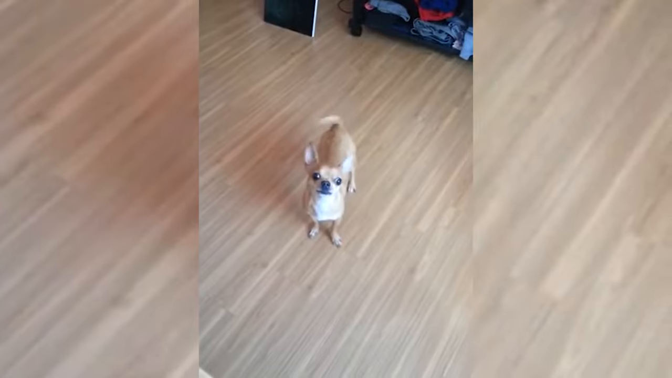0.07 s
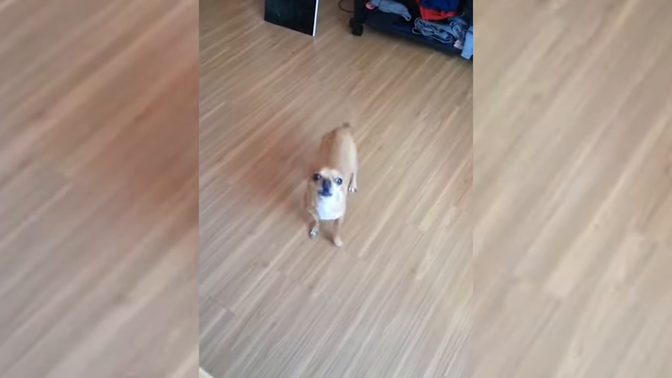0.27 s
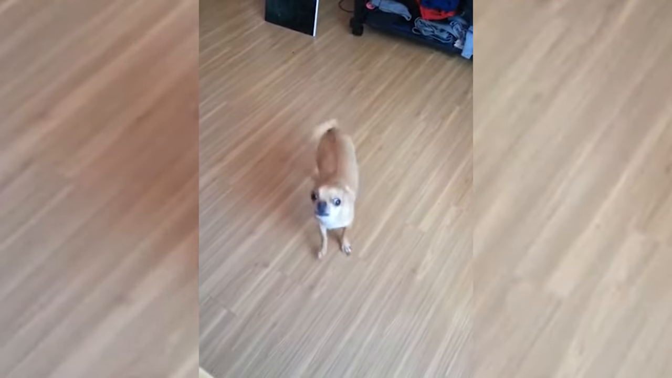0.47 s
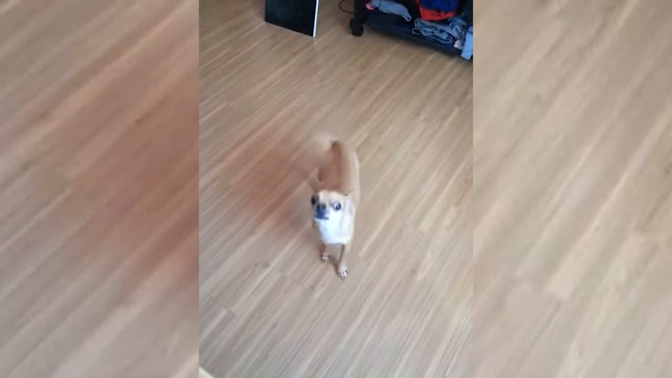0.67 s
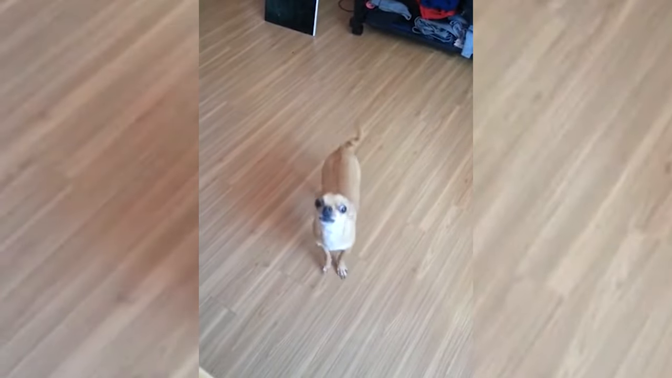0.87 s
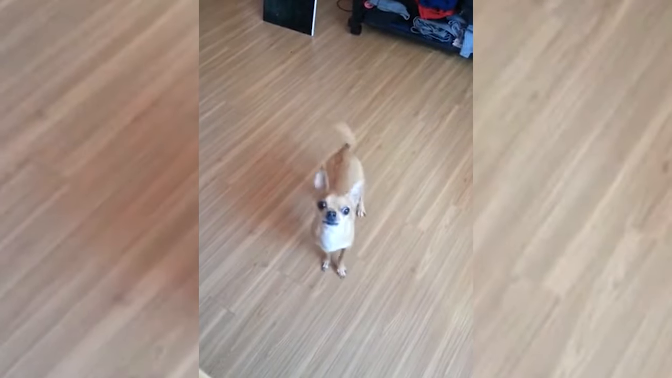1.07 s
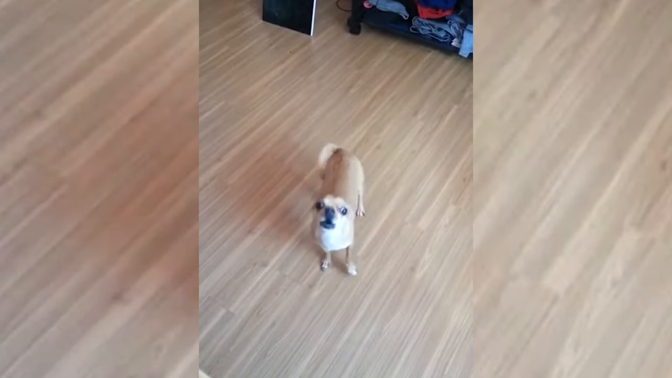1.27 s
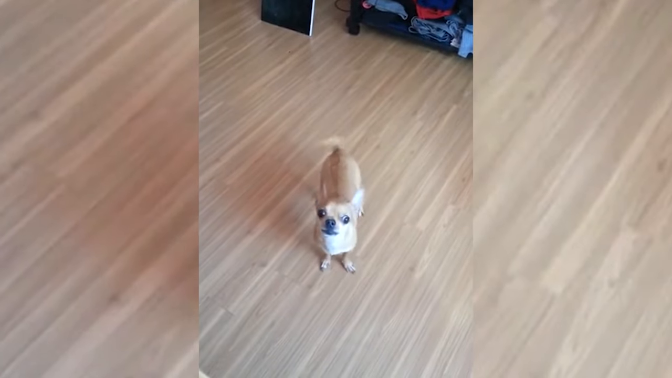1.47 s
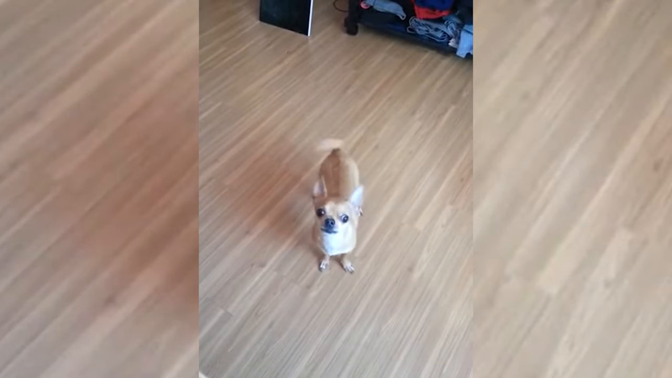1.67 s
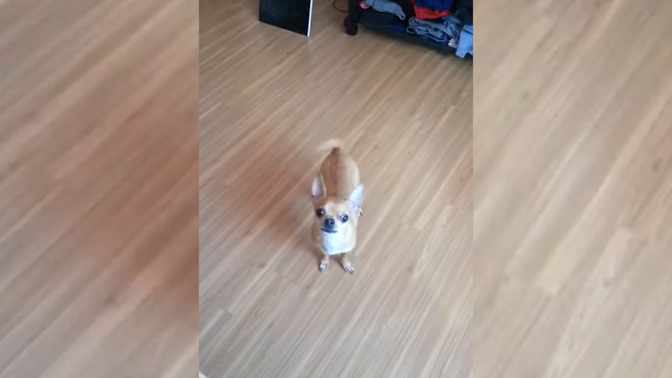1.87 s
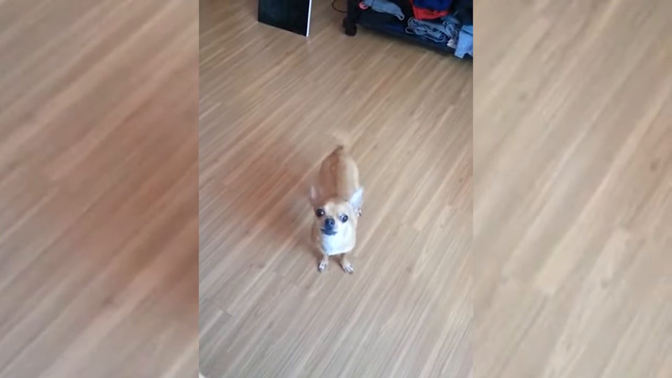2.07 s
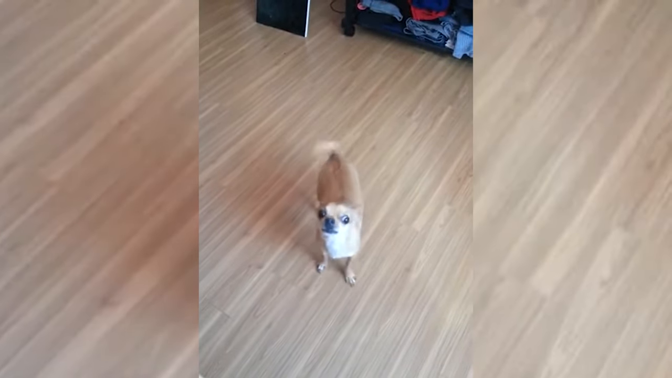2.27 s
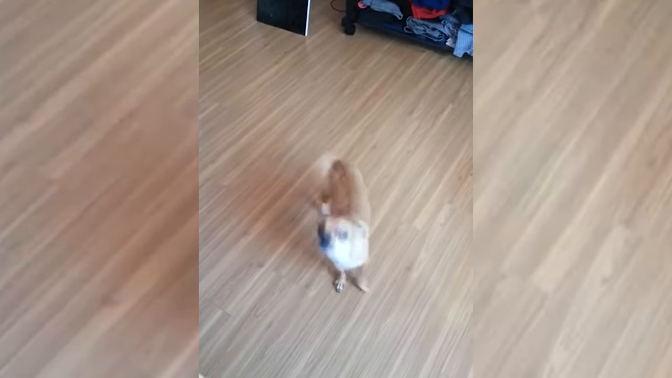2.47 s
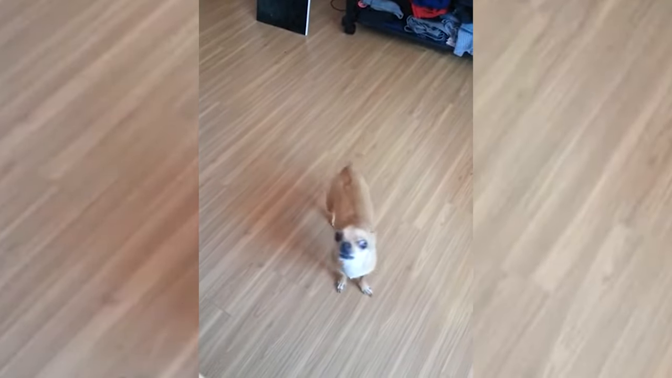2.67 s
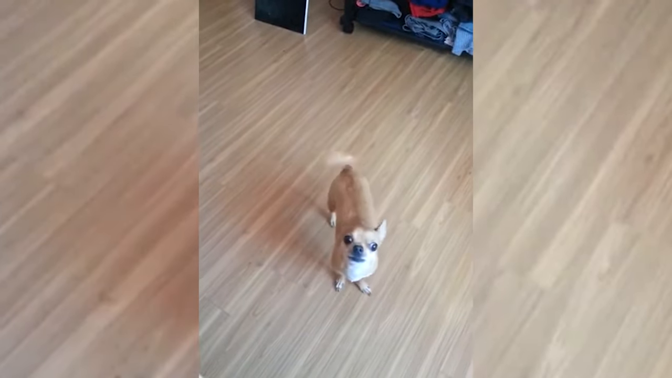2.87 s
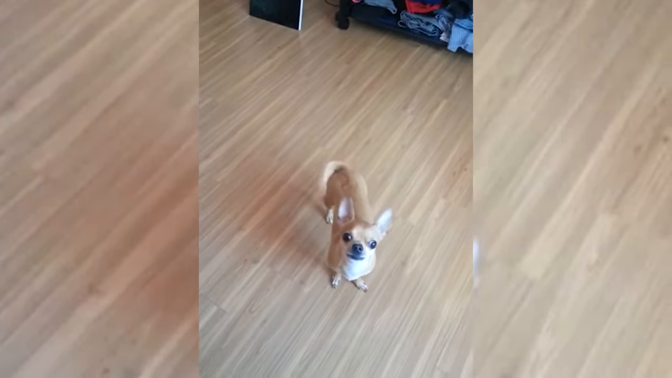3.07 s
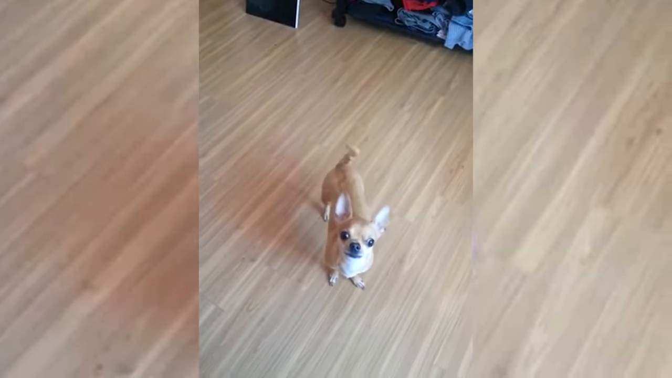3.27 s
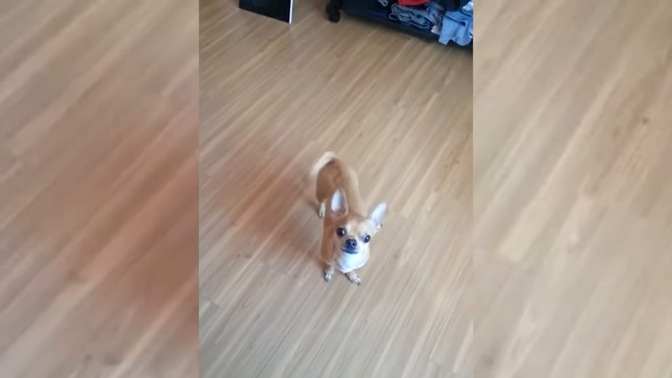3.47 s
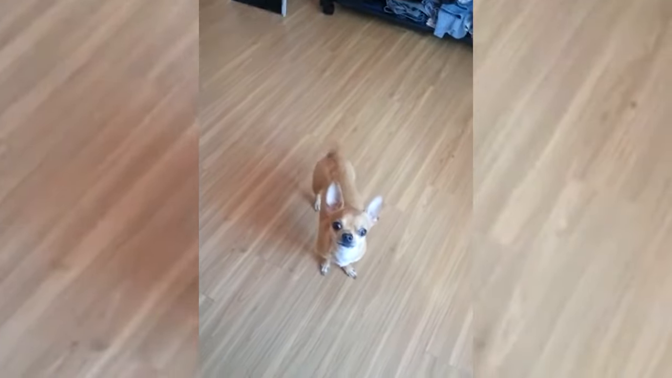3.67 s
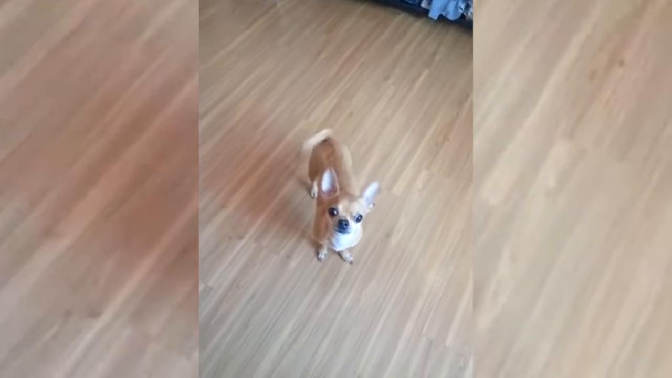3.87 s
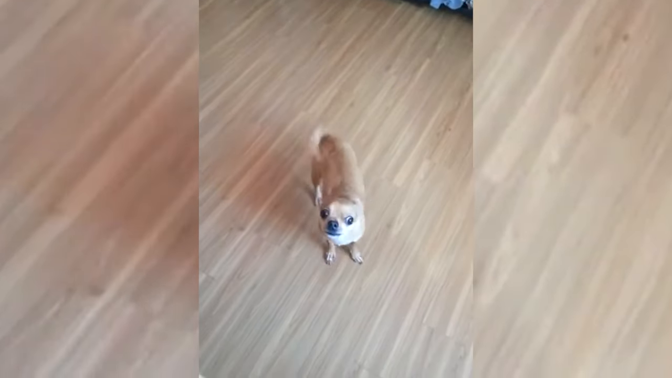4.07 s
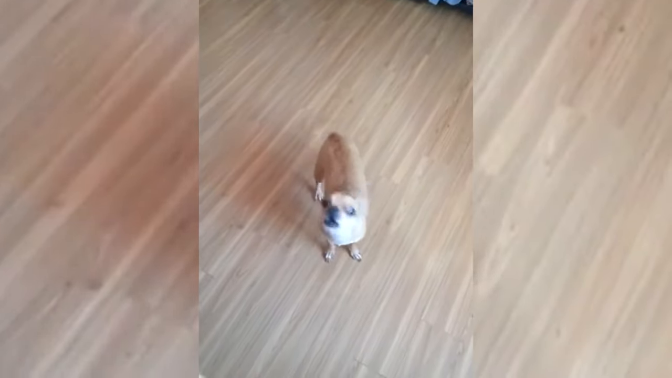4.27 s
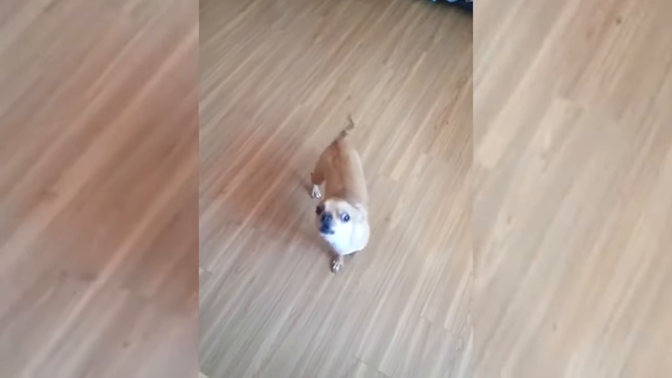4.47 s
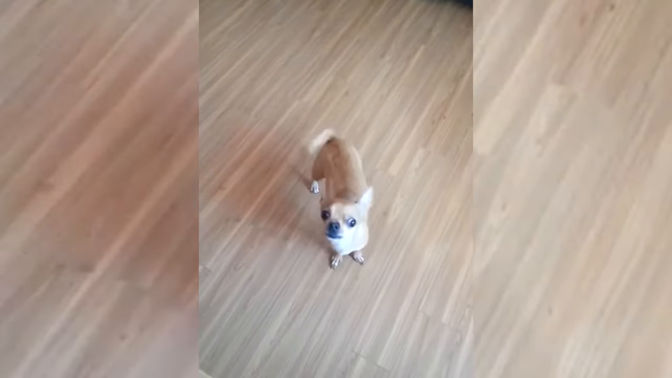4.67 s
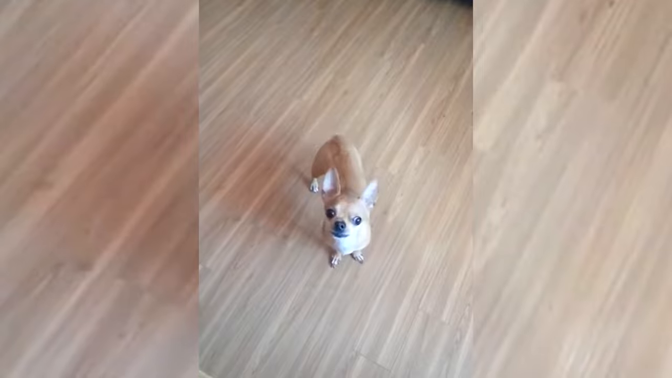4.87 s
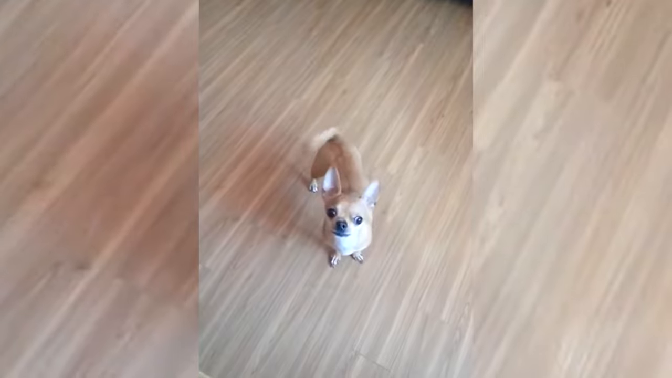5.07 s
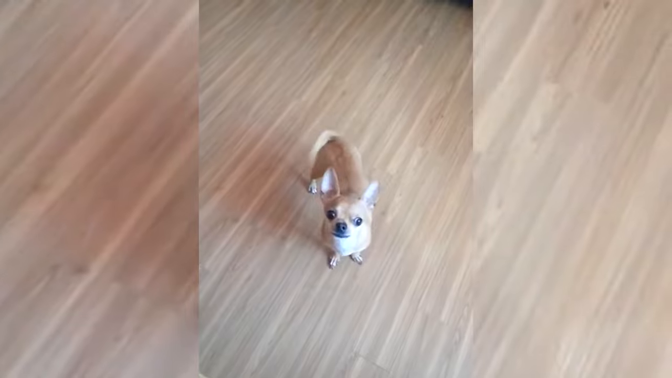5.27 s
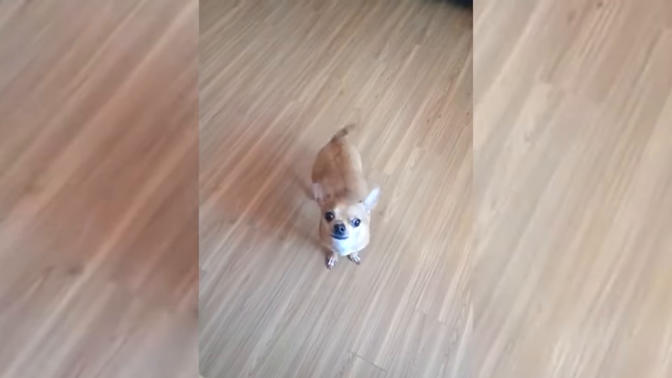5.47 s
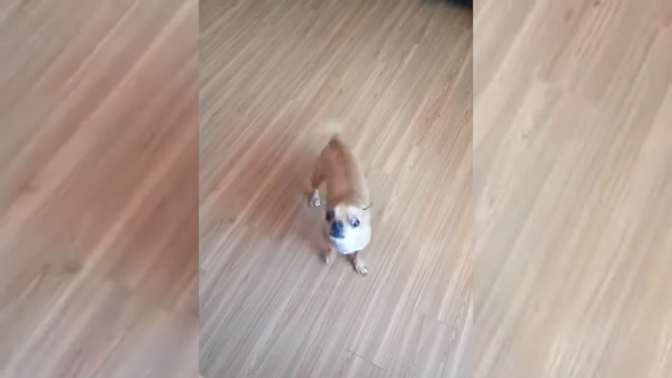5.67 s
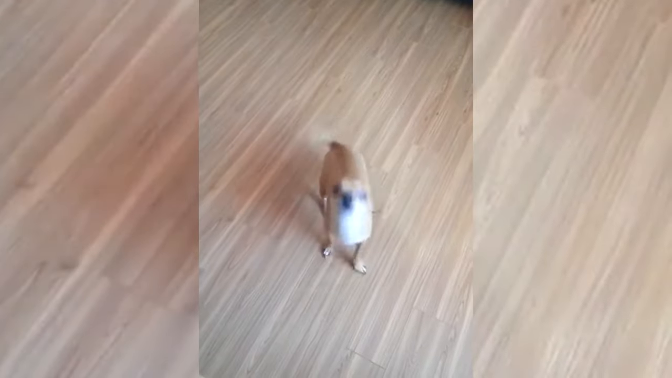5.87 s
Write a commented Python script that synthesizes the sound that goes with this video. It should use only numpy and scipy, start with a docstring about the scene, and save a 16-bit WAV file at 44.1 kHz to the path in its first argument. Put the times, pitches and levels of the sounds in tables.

```python
"""Small dog barking in a bare room

A chihuahua barks twelve times, in bunches, in a bare room with a wooden floor, over quiet air and hiss.
Each bark is a source-filter voice: harsh folds climb to a crest of pitch, then break into a clearer yelp.
Sniffs and shuffles are swells of coloured noise; grunts are single decaying noise flaps of the folds.
Echoes and a diffuse tail follow every bark, and loud peaks overload both microphones."""
import sys
import numpy as np
from scipy import signal
from scipy.fft import rfft, irfft
from scipy.io import wavfile
from scipy.ndimage import uniform_filter1d

SR = 44100
rng = np.random.default_rng(int(sys.argv[2]) if len(sys.argv) > 2 else 0)


def store_pcm(level_fs):
    """Save levels as 16-bit WAV."""
    pcm = np.round(np.clip(level_fs, -1, 1) * 32767).astype(np.int16)
    wavfile.write(sys.argv[1], SR, np.atleast_2d(pcm).T)


N = 260627
TIME = np.arange(N) / SR

# barks, a bite that breaks into a yelp; levels are relative, before the room:
# start_s, attack_s, climb_s, break_s, yelp_s, crest_hz, yelp_hz, arch_share, sag_share, bite_db, yelp_db,
# yelp_rough_0_to_1, yelp_mouth_hz (lower resonance), bite_upper_hz, yelp_upper_hz (upper resonance)
BARK_GESTURES = [ (0.237, 0.024, 0.019, 0.056, 0.062, 664.7, 515.2, -0.00098, 0.34, -1, -4.5, 0.36, 1300, 2700, 2130),
                 (.458, .034, 0.027, 0.026, .1, 692.3, 420.3, 0.071, 0.25, 0.5, -6.5, 0.069, 913, 1450, 1890),
                 (.676, 0.038, 0.042, .02, 0.065, 590.7, 361.7, .06, .14, -6, -12, 0.21, 800, 1500, 1900),
                 (1.172, 0.039, 0.049, 0.025, 0.061, 544.9, 472.2, -0.024, 0.36, -3.5, -4, 0.083, 1270, 2820, 2250),
                 (2.04, .032, .064, .022, 0.046, 610, 628.5, .05, 0.28, -0.5, -4.5, 0.39, 1330, 2810, 2230),
                 (2.277, 0.031, .072, .022, 0.074, 642, 413, 0.0085, .26, -6, -11.5, .15, 880, 2450, 1700),
                 (2.492, 0.033, 0.038, 0.015, 0.1, 624.3, 386.5, 0.042, 0.24, -5.5, -10.5, .1, 798, 1764, 2283),
                 (3.891, .036, .066, .034, .05, 598, 534.6, 0.038, 0.22, 0, -9, .32, 1190, 2840, 2400),
                 (4.188, .044, .044, .034, 0.068, 571.1, 440.2, -0.012, .23, 0, -6.5, 0.22, 1020, 2480, 1960),
                 (4.402, 0.04, 0.04, .038, 0.055, 533.5, 414, -.07, 0.46, -8.5, -8, 0.24, 1130, 1400, 1610),
                 (5.497, 0.018, 0.029, 0.029, 0.076, 559.9, 491, 0.084, -.03, -2, -3.5, 0.34, 1098, 2450, 2110),
                 (5.729, 0.03, 0.046, .026, 0.079, 641.2, 462.4, -0.055, 0.21, -0.5, -8, 0.14, 1070, 2500, 2120),
                 ]
# short throaty grunts: start_s, level_db, fade_s, mouth_hz
GRUNT_FLAPS = [(.81, -16, 0.023, 700), (.866, -26, 0.013, 675), (.893, -29, 0.021, 656),
               (.94, -25, 0.0086, 736), (.978, -20, 0.005, 760), (1, -33, 0.0085, 716),
               (1.028, -27.5, 0.0066, 668), (1.155, -18.5, 0.0041, 656), (1.166, -25, 0.015, 667),
               (2.8, -30, 0.012, 461), (2.841, -42, 0.032, 450), (4.589, -21.5, 0.013, 505)]
# quick sniffs and gasps: middle_s, length_s, level_db
SNIFF_SWELLS = [(.41, 0.082, -33.5), (.64, 0.1, -43.5), (.86, 0.051, -39), (.93, 0.044, -34),
                (2.22, 0.12, -46.5), (2.43, 0.16, -41), (4.12, .12, -51.5), (4.38, 0.056, -32.5),
                (4.6, 0.083, -39), (5.462, 0.055, -40), (5.72, 0.083, -33.5)]
# soft shuffles on the boards: middle_s, length_s, level_db
SHUFFLE_SWELLS = [(1.7, 0.11, -57.5), (3.25, 0.048, -59), (3.36, 0.27, -53), (3.62, 0.089, -62.5),
                  (5.19, 0.043, -52.5), (5.32, 0.28, -58.5)]
# spectral colour of the throat: frequency_hz, gain_db
THROAT_COLOUR = [(40, -55), (120, -49), (300, -24), (430, -13.5), (580, -8.5), (780, -0.5), (1350, -3),
                 (1620, -7), (2200, -14), (2950, -24.5), (3450, -29.5), (8000, -34), (14000, -47.5)]
# spectral colour of breath in the sniffs: frequency_hz, gain_db
BREATH_COLOUR = [(60, -42.5), (300, 3), (1500, -18), (2800, -2), (4500, 3), (8000, -3), (14000, -14.5)]
# spectral colour of the shuffles: frequency_hz, gain_db
BOARD_COLOUR = [(60, -24), (180, -6.5), (450, 2), (1300, 4.5), (3000, -5), (10000, -26)]
# reverberation time, for a decay of 60 dB: frequency_hz, t60_s
REVERB_TIME = [(150, 0.79), (500, 0.51), (1000, 0.45), (2200, 0.38), (3500, 0.11), (6000, 0.26),
               (12000, 0.24)]
# left-right correlation of the diffuse tail: frequency_hz, correlation (-1 to 1)
TAIL_CORRELATION = [(100, 1), (500, 0.99), (1000, 0.27), (1800, -.15), (4000, -0.055)]
# first reflections from floor and walls: delay_s, left_gain, right_gain
FIRST_REFLECTIONS = [(.0013, 0.05, .2), (.0052, 0.2, .08), (.0094, .08, .22), (0.0148, .18, .1)]
# spectral colour of room air and hiss: frequency_hz, gain_db
HUSH_COLOUR = [(20, -27), (60, -19.5), (110, -6.5), (170, 5), (400, 0), (900, 1), (1700, 0), (3000, -2.5),
               (4500, -4), (6300, -10), (8500, -5), (14000, -8)]
# response of the left microphone, turned away, against the right one: frequency_hz, gain_db
LEFT_RESPONSE = [(250, 3), (550, -3), (800, -1), (1100, -3), (1500, -7.5), (2000, 3), (4000, -5.5),
                 (10000, -7)]

# band limits of the whole sound and of the hush (Hz); level of the hush averaged over both channels (dB)
EDGE_HZ, HUSH_EDGE_HZ, HUSH_DB = 15000, 14400, -55.5
# pitch scatter and strength scatter at full roughness; gain of the air, times roughness squared
JITTER, SHIMMER, AIR = .075, .75, 2.7
# pitch starts at this share of the crest; exponents bend the climb and the final sag
START_SHARE, CLIMB_BEND, SAG_BEND = .56, .85, 2.1
# effort below the bite at the first instant and below the yelp at the last (dB); exponent of the fade
ONSET_DB, FADE_DB, FADE_BEND = -31, -10, 1.15
# roughness (0-1) at the first instant, in the bite, and as the folds run out of air
ROUGH_START, ROUGH_BITE, ROUGH_END = 0.36, 0.41, 0.39
# lower mouth resonance in the bite, jaw nearly shut and wide open (Hz)
JAW_SHUT_HZ, JAW_OPEN_HZ = 845, 1238
# exponent by which the upper resonance follows the yelp's glide
UPPER_FOLLOW = 0.96


def amp(db):
    """Level law: decibels to amplitude gain."""
    return 10 ** (np.asarray(db) / 20)


def unit(x):
    """Normalisation: scales a signal to rms 1."""
    return x / np.sqrt(np.mean(x ** 2) + 1e-20)


def read(points, hz):
    """Interpolation: reads a spectral table along a log-frequency axis."""
    f, value = np.transpose(points)
    return np.interp(np.log(hz + 1), np.log(f + 1), value)


def add(mix, s, sound):
    """Superposition: adds a sound into the mix from time s."""
    part = mix[..., round(s * SR):][..., :sound.shape[-1]]
    part += sound[..., :part.shape[-1]]


def colour(x, points, size=4096):
    """Minimum-phase filtering: the log gain alone fixes a causal response."""
    log_gain = np.log(amp(read(points, abs(np.fft.fftfreq(size, 1 / SR)))))
    spectrum = np.exp(np.conj(signal.hilbert(log_gain)))
    taps = np.fft.ifft(spectrum).real[:size // 2]
    return signal.fftconvolve(x, taps)[:len(x)]


def lowpass(x, hz):
    """Band limitation: a steep symmetric low-pass on both channels."""
    return signal.oaconvolve(x, signal.firwin(255, hz, fs=SR)[None], "same")


def wobble(count, hz):
    """Random modulation: smooth noise of rms 1, reaching up to about hz."""
    f = np.fft.rfftfreq(count, 1 / SR)
    spectrum = rfft(rng.standard_normal(count))
    return unit(irfft(spectrum * np.exp(-(f / hz) ** 2) * (f > 0), count))


def resonate(x, hz, width):
    """Resonance: shifts the curve hz to zero frequency, smooths with a one-pole filter, shifts back."""
    turn = np.exp(2j * np.pi * np.cumsum(hz) / SR)
    r = np.exp(-np.pi * width / SR)
    return 2 * (turn * signal.lfilter([1 - r], [1, -r], x / turn)).real


def gesture(attack_s, climb_s, break_s, yelp_s, crest_hz, yelp_hz, arch, sag, bite_db, yelp_db,
            yelp_rough, yelp_mouth_hz, bite_upper_hz, yelp_upper_hz):
    """Vocal gesture: pitch, effort, roughness and mouth resonances cross from bite to yelp."""
    t = np.arange(0, climb_s + break_s + yelp_s, 1 / SR)
    push = 1 - np.clip(1 - t / attack_s, 0, 1) ** 2
    climb = np.clip(t / climb_s, 0, 1) ** CLIMB_BEND
    broken = np.sin(np.pi / 2 * np.clip((t - climb_s) / break_s, 0, 1))
    spent = np.clip((t - climb_s - break_s) / yelp_s, 0, 1)
    # pitch and mouth glide together through the yelp
    glide = (1 + arch * np.sin(np.pi * spent)) * (1 - sag * spent ** SAG_BEND)
    # each list holds pitch, effort, roughness and lower resonance
    bite = [
        crest_hz * (START_SHARE + (1 - START_SHARE) * climb),
        bite_db + ONSET_DB * (1 - push),
        ROUGH_START + (ROUGH_BITE - ROUGH_START) * push,
        JAW_SHUT_HZ + (JAW_OPEN_HZ - JAW_SHUT_HZ) * np.sqrt(push * climb),
    ]
    yelp = [
        yelp_hz * glide,
        yelp_db + FADE_DB * spent ** FADE_BEND,
        yelp_rough + (ROUGH_END - yelp_rough) * spent ** 2,
        yelp_mouth_hz * glide,
    ]
    # the lips move all through the bite and arrive as the yelp begins
    lips = np.clip(t / (climb_s + break_s), 0, 1) ** 2
    upper_hz = (bite_upper_hz + (yelp_upper_hz - bite_upper_hz) * lips) * glide ** UPPER_FOLLOW
    hz, effort_db, rough, mouth_hz = (1 - broken) * np.array(bite) + broken * np.array(yelp)
    return hz, effort_db, rough, mouth_hz, upper_hz


def vocal_folds(hz, rough, calm_jitter=0.0074, half_tone=0.19, tilt_db=2.5):
    """Voice source: harmonics turn unsteady and air escapes in puffs as the folds roughen."""
    count = len(hz)
    scatter = (calm_jitter + JITTER * rough) * wobble(count, hz=246.0)
    turns = np.cumsum(hz * (1 + scatter)) / SR
    # tilt_db is the rise per octave over twenty harmonics
    folds = unit(sum(amp(tilt_db * np.log2(k)) * np.cos(2 * np.pi * k * turns) for k in range(1, 21)))
    # rough folds alternate strong and weak cycles and shake in strength
    alternation = half_tone * np.cos(np.pi * turns)
    folds *= 1 + rough * (alternation + SHIMMER * wobble(count, hz=220))
    # air swells once a cycle and grows as the folds turn harsh
    puffs = unit((1.5 + np.cos(2 * np.pi * turns)) * rng.standard_normal(count))
    return (1 - rough) * folds + AIR * rough ** 2 * puffs


def bark(hz, effort_db, rough, mouth_hz, upper_hz, mouth_width_hz=310, mouth_gain=4.57,
         upper_width_hz=620, upper_gain=1.6, nose_hz=430, nose_width_hz=200, nose_gain=0.9, shut_hz=750):
    """Source-filter principle: fold sound excites the throat, two moving mouth resonances and the nose."""
    count = len(hz)
    voice = colour(vocal_folds(hz, np.clip(rough, 0, 1)), THROAT_COLOUR)
    mouth = resonate(voice, mouth_hz, mouth_width_hz)
    # two passes give the upper resonance and the nose steep sides
    upper = resonate(resonate(voice, upper_hz, upper_width_hz), upper_hz, upper_width_hz)
    nose_curve = np.full(count, nose_hz)
    nose = resonate(resonate(voice, nose_curve, nose_width_hz), nose_curve, nose_width_hz)
    # the nose carries the low end while the mouth is nearly shut
    nose *= (shut_hz / mouth_hz) ** 2
    voice = voice + mouth_gain * mouth + upper_gain * upper + nose_gain * nose
    # levelling by the running rms lets effort set the loudness, whatever the mouth does
    voice /= np.sqrt(abs(uniform_filter1d(voice ** 2, size=600)) + 1e-9)
    return voice * amp(effort_db) * signal.windows.tukey(count, .09)


def grunts(width_hz=190, open_share=0.3):
    """Damped impulse: each flap of the folds is fading noise behind a nearly closed, resonant mouth."""
    out, t = np.zeros(N), TIME[:SR // 8]
    for s, db, fade, hz in GRUNT_FLAPS:
        flap = colour(rng.standard_normal(len(t)), THROAT_COLOUR)
        flap = resonate(flap, np.full(len(t), hz), width_hz) + open_share * flap
        envelope = np.exp(-t / fade) * signal.windows.tukey(len(t), .02)
        add(out, s, amp(db) * unit(flap) * envelope)
    return out


def swishes(table, points):
    """Modulated noise: bell-shaped swells shape noise of one colour."""
    swell = sum(amp(db) * np.exp(-(2 * (TIME - s) / length) ** 2) for s, length, db in table)
    return swell * unit(colour(rng.standard_normal(N), points))


def sniffs():
    """Turbulence: quick breaths as swells of noise."""
    return swishes(SNIFF_SWELLS, BREATH_COLOUR)


def shuffles():
    """Friction: rubbing on the boards as soft swells of noise."""
    return swishes(SHUFFLE_SWELLS, BOARD_COLOUR)


def room(x, tail_db=-3.0, build_up=0.0028):
    """Reverberation: direct sound, first reflections and a decaying diffuse tail at two microphones."""
    t = TIME[:SR]
    hz, age, (a, b) = signal.stft(rng.standard_normal((2, SR)), SR, nperseg=256)
    same = np.clip(read(TAIL_CORRELATION, hz), -1, 1)[:, None]
    pair = np.array([a, same * a + np.sqrt(1 - same ** 2) * b])
    pair = pair * amp(-60 * age / read(REVERB_TIME, hz)[:, None])
    tail = signal.istft(pair, SR, nperseg=256)[1][:, :SR]
    tail = tail * (1 - np.exp(-t / build_up))
    # the tail's level is taken in the band of the voice, 700 to 1600 Hz
    voice_band = abs(rfft(tail))[:, 700:1600]
    response = amp(tail_db) * tail / np.sqrt(np.mean(voice_band ** 2, axis=1, keepdims=True))
    # the right microphone is nearer by two samples of travel
    response[0, 2] += 1
    response[1, 0] += 1
    for delay, left, right in FIRST_REFLECTIONS:
        response[:, round(delay * SR)] += left, right
    return signal.fftconvolve(x[None], response, axes=1)


def hush(own_share=1.0):
    """Background noise: room air and microphone hiss, part shared and part independent between channels."""
    shared, left, right = (colour(noise, HUSH_COLOUR) for noise in rng.standard_normal((3, N)))
    both = lowpass(shared + own_share * np.array([left, right]), HUSH_EDGE_HZ)
    return amp(HUSH_DB) * both / both.mean(0).std()


def scene(voice_db=1):
    """Superposition: the dog fidgets, so each bark meets its own random room tail."""
    mix = np.zeros((2, N))
    add(mix, 0, room(grunts() + sniffs() + shuffles()))
    for s, *shape in BARK_GESTURES:
        voice = amp(voice_db) * bark(*gesture(*shape))
        add(mix, s, room(voice))
    left = colour(mix[0], LEFT_RESPONSE)
    return np.array([left, mix[1]]) + hush()


def record(dry, knee=7):
    """Saturation: loud peaks flatten at full scale, then the band is limited."""
    flattened = dry / (1 + abs(dry) ** knee) ** (1 / knee)
    return lowpass(flattened, EDGE_HZ)


dry = scene()
out = record(dry)
store_pcm(out)
```